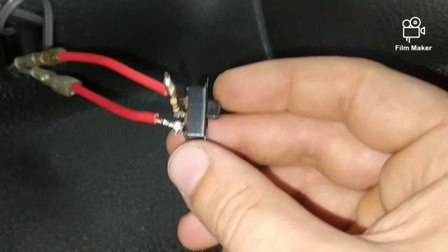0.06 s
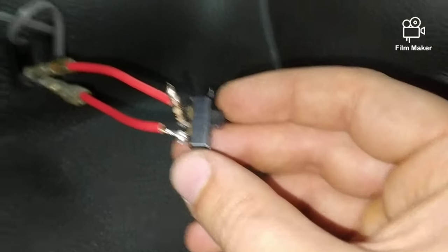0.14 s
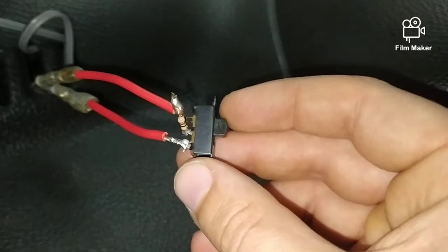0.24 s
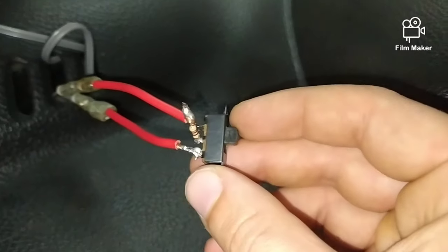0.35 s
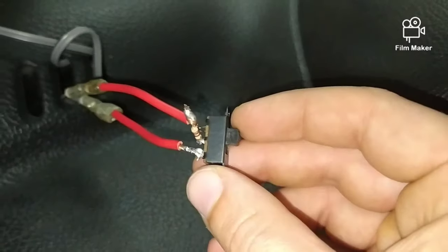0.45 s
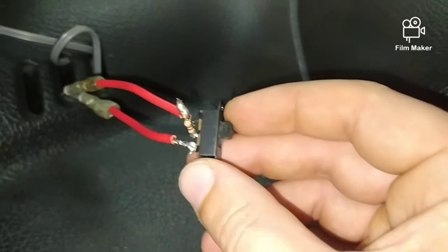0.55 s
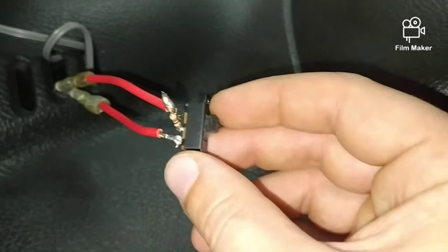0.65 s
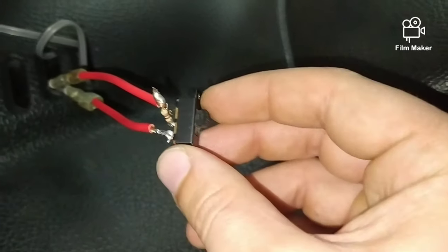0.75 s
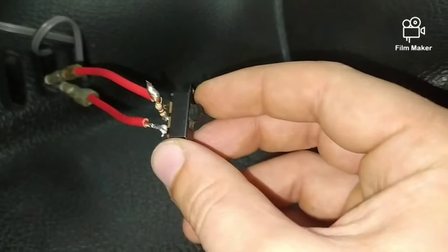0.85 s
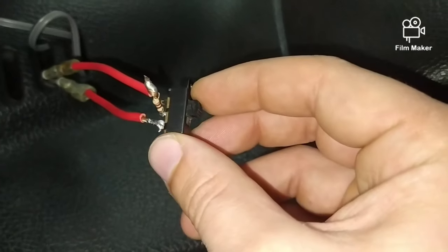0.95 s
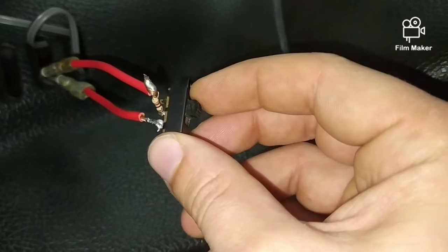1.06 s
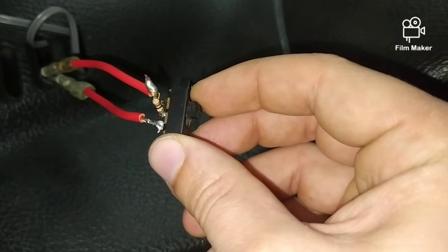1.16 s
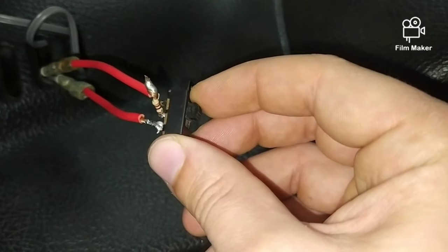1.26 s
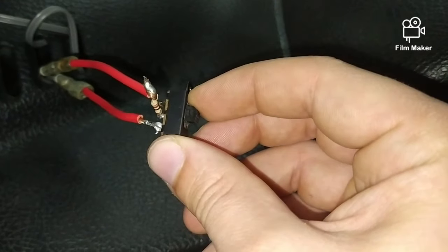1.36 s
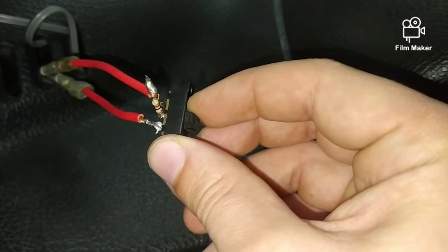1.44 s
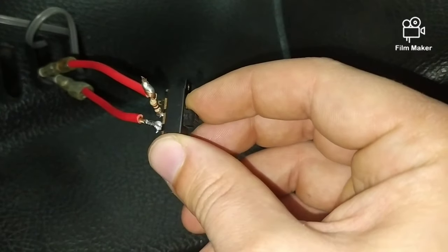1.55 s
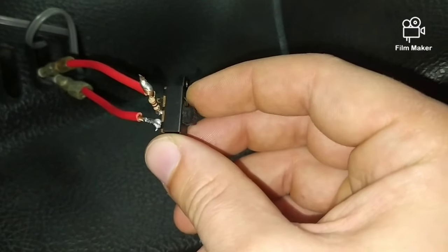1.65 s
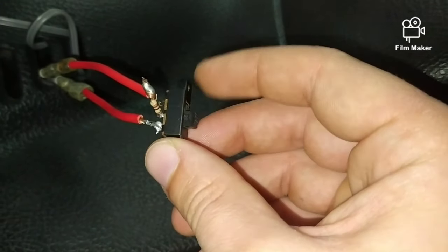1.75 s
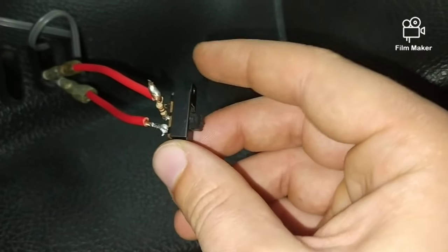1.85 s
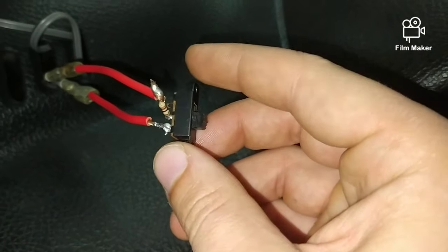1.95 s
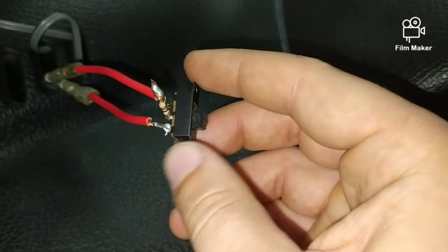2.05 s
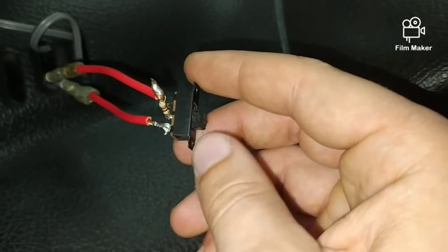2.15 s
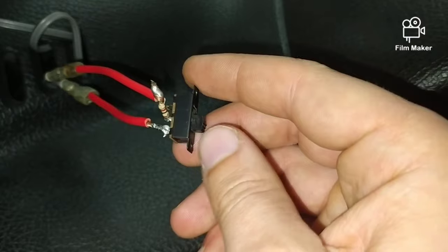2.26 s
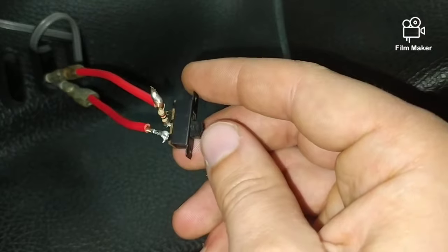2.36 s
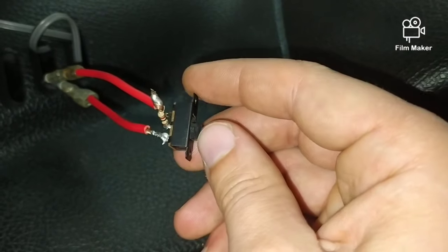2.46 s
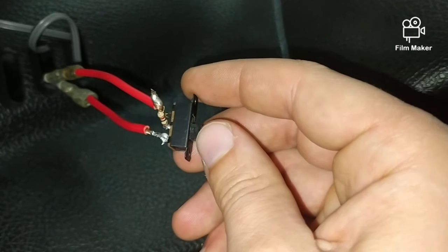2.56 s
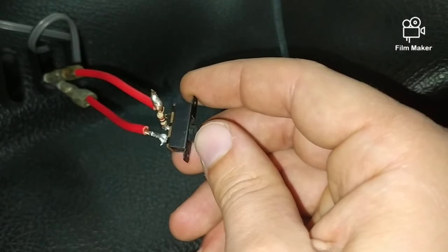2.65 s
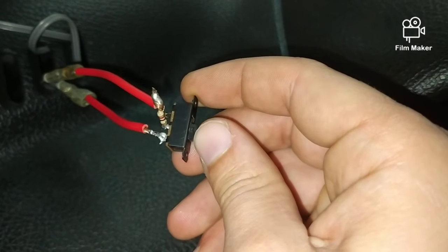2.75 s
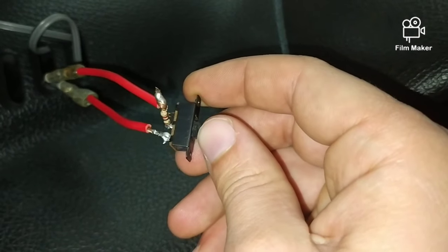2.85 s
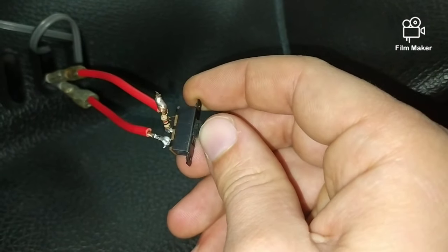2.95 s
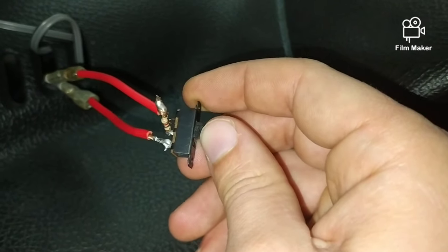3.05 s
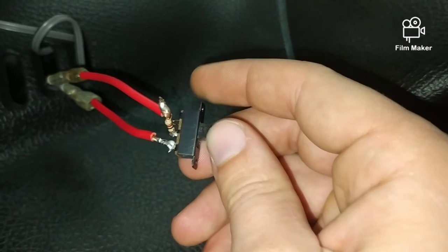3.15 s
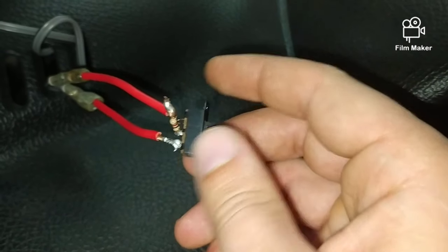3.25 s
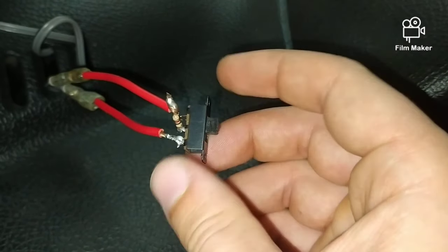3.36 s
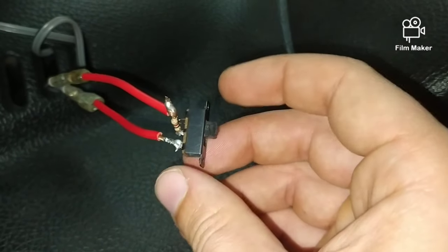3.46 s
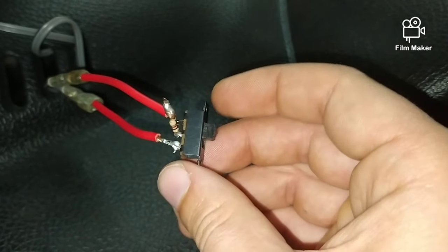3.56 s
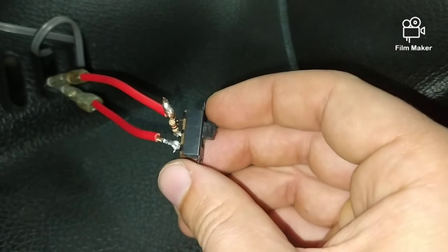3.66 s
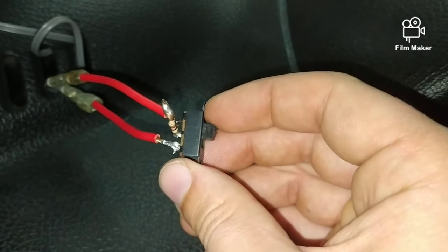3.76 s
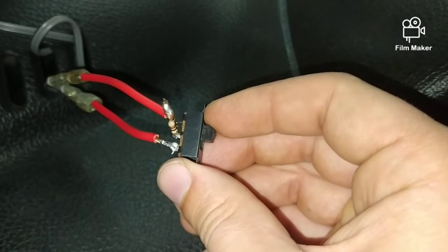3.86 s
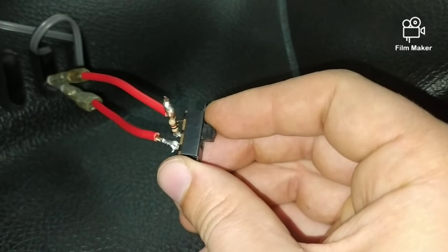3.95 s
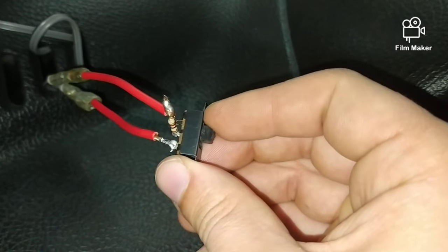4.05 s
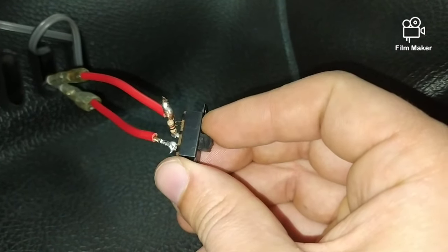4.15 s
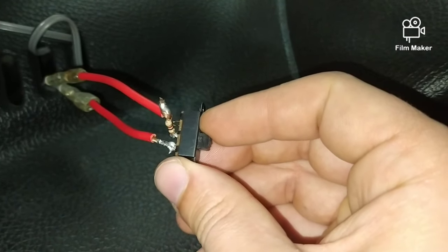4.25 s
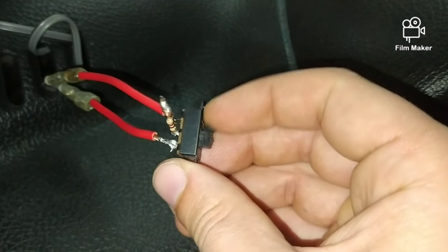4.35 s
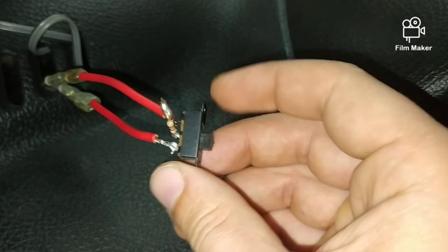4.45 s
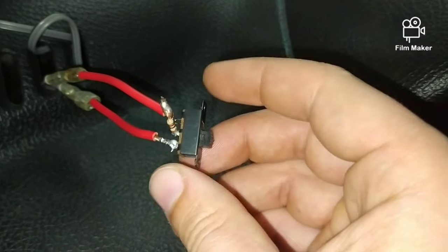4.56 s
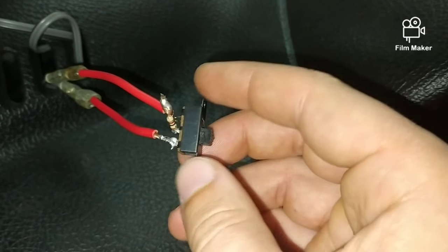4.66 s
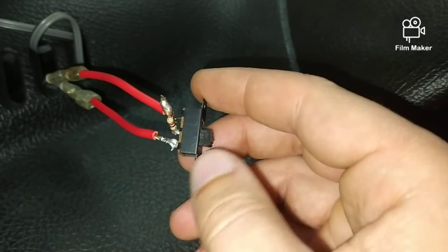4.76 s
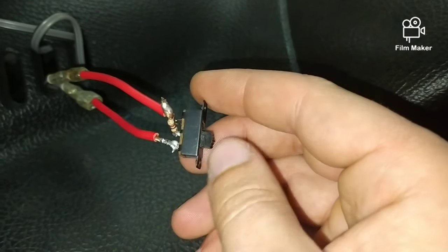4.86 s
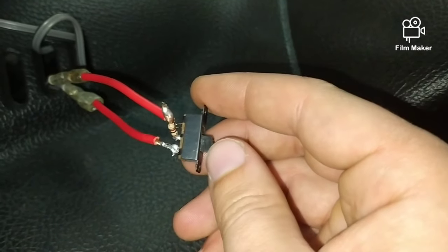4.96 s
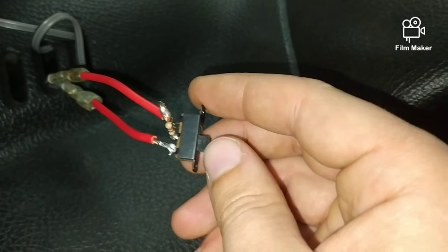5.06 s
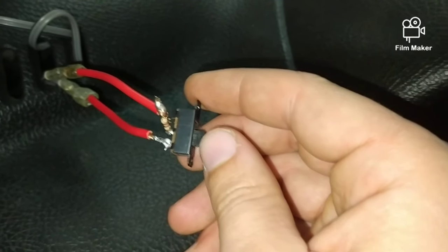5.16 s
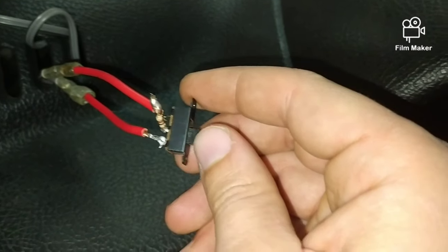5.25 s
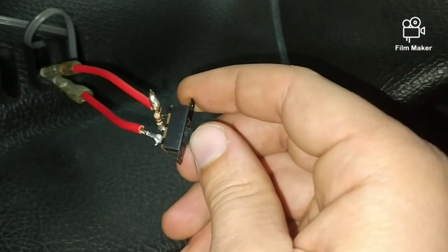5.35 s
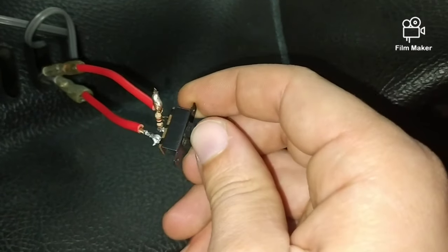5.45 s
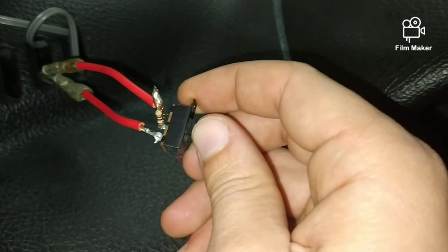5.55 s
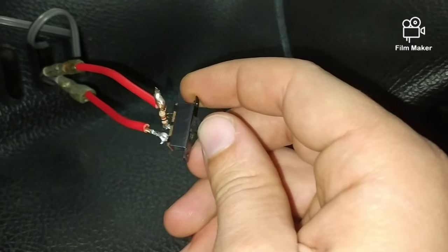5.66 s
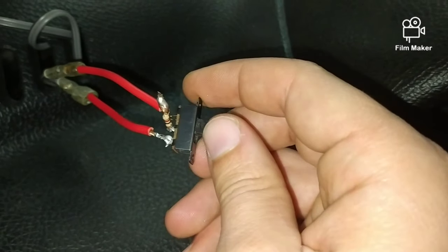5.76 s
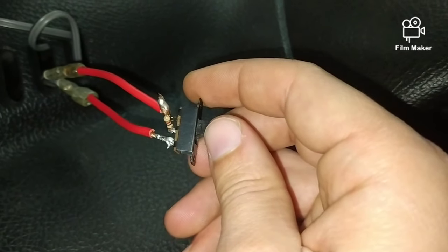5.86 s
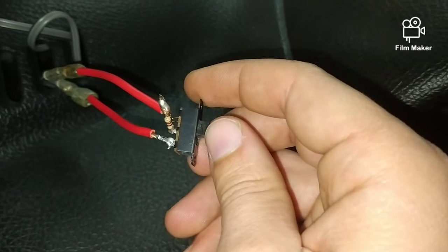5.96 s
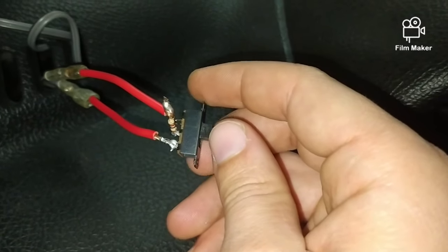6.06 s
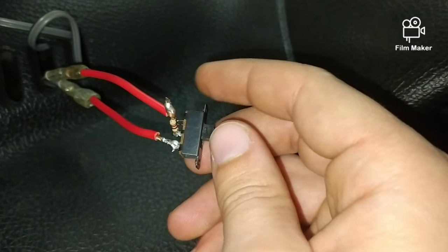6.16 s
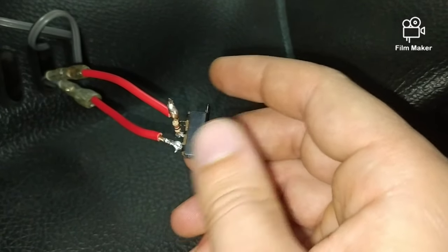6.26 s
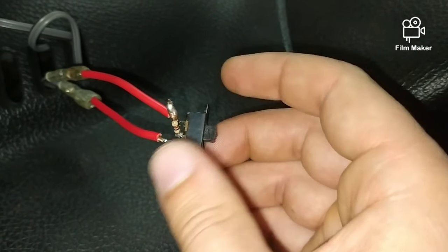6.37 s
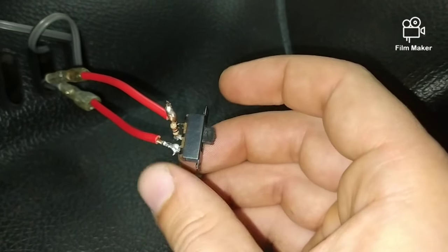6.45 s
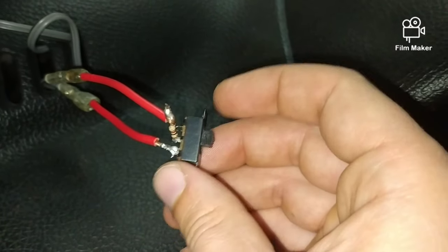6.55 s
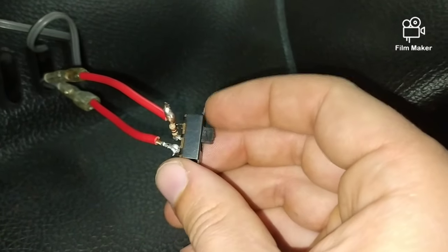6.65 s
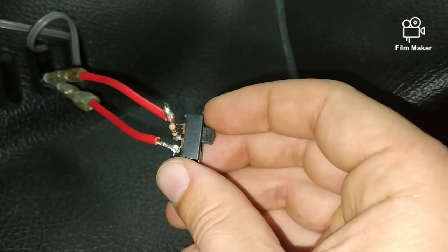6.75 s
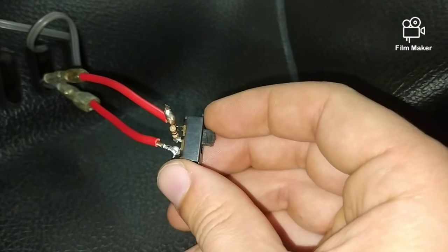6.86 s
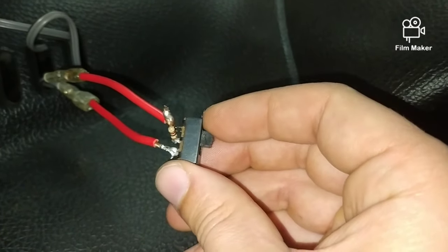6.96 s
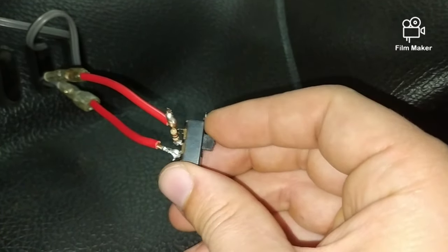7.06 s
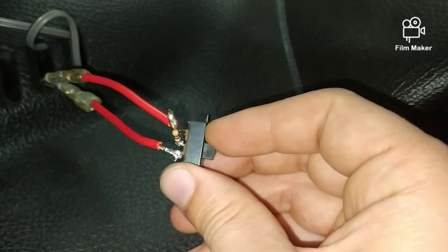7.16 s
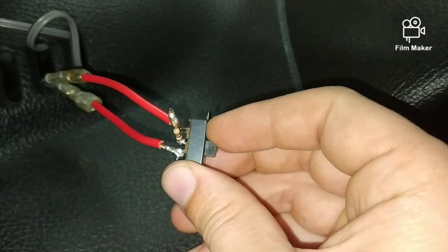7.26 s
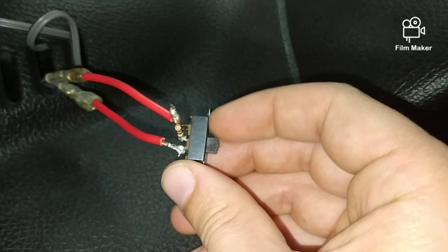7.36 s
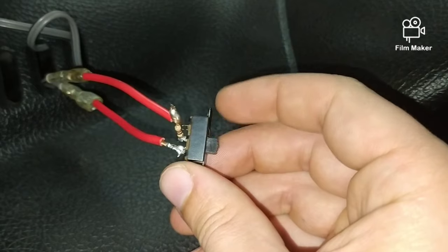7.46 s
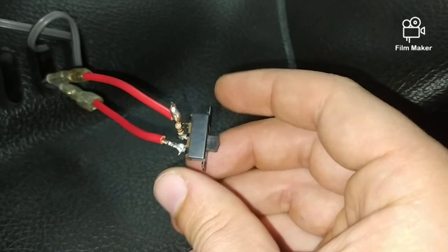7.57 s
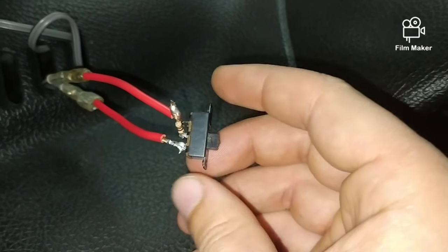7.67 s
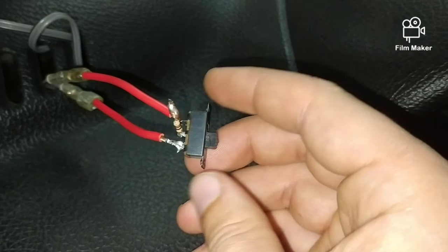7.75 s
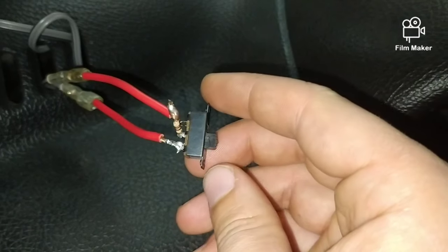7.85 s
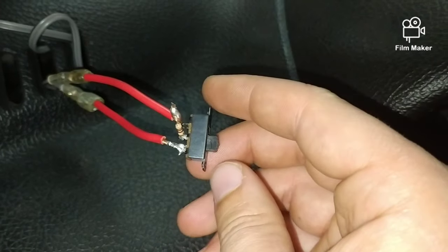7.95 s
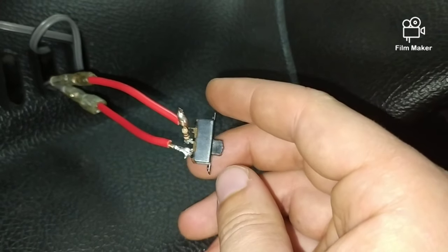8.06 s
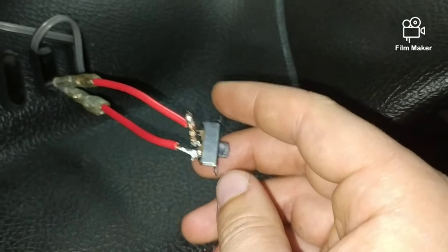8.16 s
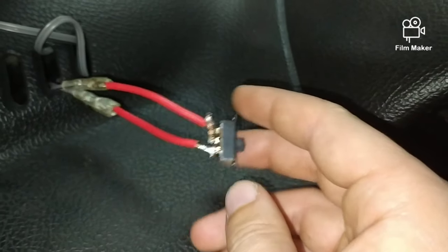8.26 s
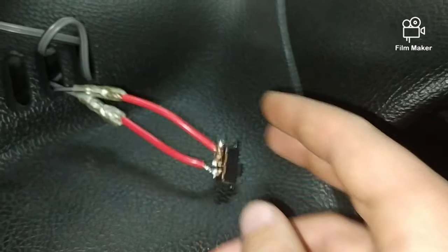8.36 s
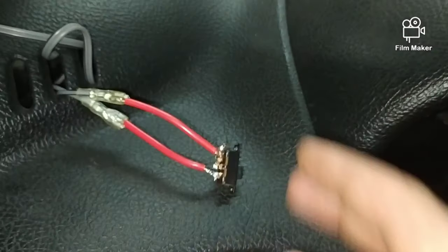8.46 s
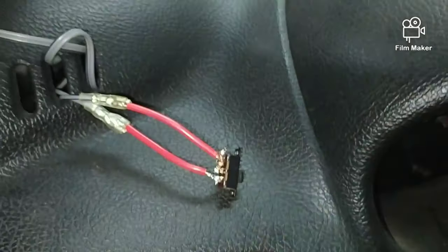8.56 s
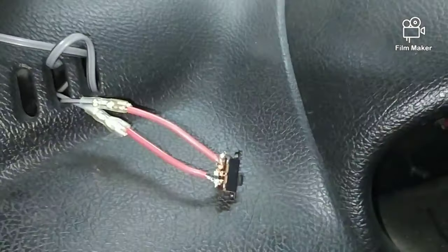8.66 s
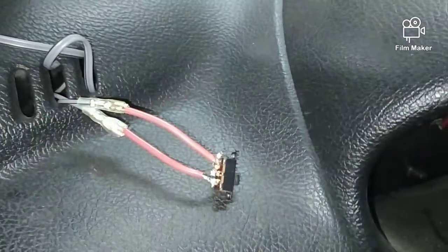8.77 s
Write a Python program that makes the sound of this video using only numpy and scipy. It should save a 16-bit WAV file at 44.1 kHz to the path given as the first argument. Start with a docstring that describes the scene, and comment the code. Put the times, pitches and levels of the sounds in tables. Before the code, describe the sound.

Close stereo phone pickup inside a parked car: near silence, light hiss and a very faint, steady cricket to the right. A little switch is pushed back and forth, giving five hard, sharp clicks, with small dull taps, skin rustle and grip creaks around them. After a pause, fingers slip away, the switch drops against a plastic panel with a bouncing clack, and a sleeve rustles softly.

```python
"""First heard is a quiet night, faint air and hiss, with a cricket outside on the right: narrow noise in chirps.
Inside a parked car, close to a phone with two microphone ports, a hand works a small slide switch on stiff
wires. Each snap is a burst of contacts ringing the metal shell and echoing in the cabin. Fingers and sleeve
rustle as grainy filtered noise; the switch taps a plastic panel and at last drops against it.
"""
import sys
import numpy as np
from scipy import signal
from scipy.fft import rfft, irfft, next_fast_len
from scipy.io import wavfile
from scipy.ndimage import uniform_filter1d

SR = 44100
rng = np.random.default_rng(int(sys.argv[2]) if len(sys.argv) > 2 else 0)


def field_ratio(decibels):
    """Amplitude ratio for a level in dB (20 dB per decade); scalars and array-likes work."""
    return 10 ** (np.asarray(decibels, dtype=float) / 20)


def digitize_waveform(pressure):
    """Quantize a signal to 16-bit integers and store it at the path in sys.argv[1].

    Rows of a 2-D input are taken as channels; values are limited to [-1, 1].
    """
    field = np.atleast_2d(pressure).T
    bounded = np.clip(field, -1, 1)
    quanta = np.round(bounded * 32767).astype(np.int16)
    wavfile.write(sys.argv[1], SR, quanta)


N = 388521
TIME = np.arange(N) / SR


def level(x, db):
    """Scale to an rms level."""
    return x * field_ratio(db) / np.sqrt(np.mean(x ** 2))


def resonate(x, peaks):
    """Sum of band-pass resonances (frequency [Hz], width [Hz], level [dB])."""
    return sum(field_ratio(db) * signal.lfilter(*signal.iirpeak(hz, hz / width, SR), x) for hz, width, db in peaks)


def walk(rate):
    """Random levels around zero, held 1 / rate s and slewed."""
    hold = int(SR / rate)
    steps = np.repeat(rng.standard_normal(N // hold + 1), hold)
    return uniform_filter1d(steps, hold)[:N]


def sides(pan_db):
    """Left and right gains for a left-minus-right difference."""
    return field_ratio(np.array([[pan_db], [-pan_db]]) / 2)


def swell(start, rise, hold, fall_db, db):
    """Gain that rises smoothly, holds and dies away at a steady rate in dB per s."""
    t = TIME - start
    after = np.maximum(t - rise - hold, 0)
    return np.sin(np.pi / 2 * np.clip(t / rise, 0, 1)) ** 3 * field_ratio(db - fall_db * after)


def friction(peaks, alike, grain_db):
    """Noise in uneven grains through the resonances of what is rubbed; alike is the share common to both ports."""
    shared, own = rng.standard_normal(N), rng.standard_normal((2, N))
    noise = np.sqrt(alike) * shared + np.sqrt(1 - alike) * own
    grains = field_ratio(grain_db * walk(60)) * noise
    return level(resonate(resonate(grains, peaks), peaks), 0)


NEAR_ECHO_DB, NEAR_LOSS_DB_PER_MS = -26.5, 1.4
FAR_ECHO_MS, FAR_ECHO_DB, FAR_LOSS_DB_PER_MS = 7.7, -32.5, 1.12
LATE_DB, LATE_LOSS_DB_PER_MS = -65, 0.37


def cabin(shared_hz=900):
    """Direct path, echoes of near panels and far windows, a faint long tail; the ports share the bass only."""
    ms = np.arange(int(.3 * SR)) / SR * 1000
    near = field_ratio(NEAR_ECHO_DB - NEAR_LOSS_DB_PER_MS * ms)
    far = np.clip(ms - FAR_ECHO_MS + 1, 0, 1) * field_ratio(FAR_ECHO_DB - FAR_LOSS_DB_PER_MS * (ms - FAR_ECHO_MS))
    late = field_ratio(LATE_DB - LATE_LOSS_DB_PER_MS * ms)
    echo = rng.standard_normal((3, len(ms))) * np.sqrt(near ** 2 + far ** 2 + late ** 2)
    low = signal.lfilter(*signal.butter(2, shared_hz, fs=SR), echo)
    echo = low[2] + echo[:2] - low[:2]
    echo[:, 0] = 1  # direct path
    return echo


PORT_HZ, PORT_WIDTH_HZ, OFF_PORT_DB_PER_S = 8920, 700, 420
LEFT_PORT_DB, LEFT_PORT_WIDTH_HZ = 3.5, 1100  # the left port resonates more strongly
BUILD_CYCLES = 3.1  # a resonance needs about this long to build up, so the lows come late


def strike(peaks, colour_db, contacts_ms, contacts_db, lag_ms, damp_db):
    """Quick contacts, echoed by the cabin, ring each resonance; the sound reaches the left port a little later."""
    force = np.zeros((2, SR // 100))
    size = field_ratio(contacts_db) * rng.choice([-1, 1], len(contacts_db))
    for port, lag in enumerate([lag_ms, 0]):
        force[port, ((np.asarray(contacts_ms) + lag) * SR / 1000).astype(int)] = size
    heard = signal.fftconvolve(force, cabin(), axes=1)
    hit = 0
    for (hz, width, db), change_db in zip(peaks, colour_db):
        ring = resonate(resonate(heard, [(hz, width, 0)]), [(hz, 2.9 * width, 0)])
        t = np.arange(ring.shape[1]) / SR
        # broad resonances lose their echoes sooner; the band where the ports resonate lasts longest
        fade_db = damp_db * np.sqrt(width) + OFF_PORT_DB_PER_S * min(abs(hz - PORT_HZ) / PORT_WIDTH_HZ, 1)
        build = 1 - np.exp(-(t * hz / BUILD_CYCLES) ** 2)
        ring = ring * field_ratio(-fade_db * np.minimum(t, .06)) * build
        ring = ring / np.sqrt(np.sum(ring ** 2, 1, keepdims=True))
        lean = sides(LEFT_PORT_DB * np.exp(-((hz - PORT_HZ) / LEFT_PORT_WIDTH_HZ) ** 2))
        # neighbouring resonances swing in opposite senses, so the valleys between them stay filled
        hit = -hit + field_ratio(db + change_db) * lean * ring
    return hit


def add(out, sound, s, db, pan_db):
    """Mix a two-port sound in at a time, level and side."""
    first = int(s * SR)
    sound = sound[:, :N - first]
    out[:, first:first + sound.shape[1]] += sound * field_ratio(db) * sides(pan_db)


# spectrum of the night air before its overall level: (frequency [Hz], relative density [dB per Hz])
NIGHT_SPECTRUM = [(3, -31), (6, 4.5), (40, -5), (100, -16), (320, -18), (950, -28.5), (2550, -30.5),
                  (3250, -35.5), (4400, -35), (5400, -37), (8900, -33.5), (9600, -32.5), (9900, -29.5),
                  (10250, -33), (10700, -30.5), (11000, -45), (12300, -42), (12750, -34.5), (13500, -48),
                  (15600, -48), (16000, -61.5), (16400, -86)]
# far hum: (frequency [Hz], width [Hz], level [dB])
FAR_HUM = (198, 18, -81.5)
NIGHT_DB = -66.5


def night():
    """Distant air and microphone hiss as shaped noise, partly shared in the bass; narrow noise is a wavering hum."""
    hz, db = np.transpose(NIGHT_SPECTRUM)
    size = next_fast_len(N)
    f = np.maximum(np.arange(size // 2 + 1) * SR / size, 1)
    alike = 0.079 * np.clip(np.log2(1400 / f) / 2.0, 0, 1)
    noise = rfft(rng.standard_normal((3, size)))
    mixed = np.sqrt(alike) * noise[2] + np.sqrt(1 - alike) * noise[:2]
    air = irfft(mixed * field_ratio(np.interp(np.log(f), np.log(hz), db)), size)[:, :N]
    hum_hz, hum_width, hum_db = FAR_HUM
    hum = resonate(rng.standard_normal(N), [(hum_hz, hum_width, 0)])
    return level(air, NIGHT_DB) * field_ratio(0.15 * walk(4.3)) + level(hum, hum_db)


CRICKET_HZ, CRICKET_DB, CRICKET_LEFT_DB = 4504, -79.5, -19  # left gain relative to the right
CHIRP_START_S, CHIRP_PERIOD_S, CHIRP_LENGTH_S, SYLLABLES_HZ = .095, .4588, .35, 43


def cricket():
    """Even chirps of short wing strokes on one pitch over a weaker steady tone, made grainy by echoes on the way."""
    place = (TIME - CHIRP_START_S) % CHIRP_PERIOD_S / CHIRP_LENGTH_S
    chirp = 0.29 + np.sin(np.pi * np.clip(place, 0, 1)) ** 0.34
    strokes = 1 + .3 * np.sin(2 * np.pi * SYLLABLES_HZ * TIME + 1.5 * walk(8))
    # narrow noise gives the grain
    wing = resonate(rng.standard_normal((2, N)), [(CRICKET_HZ, 120, 0)])
    wing = resonate(wing, [(CRICKET_HZ, 200, 0)])
    return level(wing * chirp * strokes, CRICKET_DB) * field_ratio(np.array([[CRICKET_LEFT_DB], [0]]))


# faint narrow squeaks on the right: (start [s], hold [s], pitch [Hz], width [Hz], level [dB])
SQUEAK_EVENTS = [(0.636, 0.074, 1860, 200, -77.5), (3.211, 0.036, 2230, 348, -73.5)]
SQUEAK_RISE_S, SQUEAK_FALL_DB_PER_S, SQUEAK_PAN_DB = .012, 130, -10


def squeaks():
    """Short bands of narrow noise, perhaps skin or leather slipping."""
    out = 0
    for s, hold, hz, width, db in SQUEAK_EVENTS:
        gain = swell(s, SQUEAK_RISE_S, hold, SQUEAK_FALL_DB_PER_S, db)
        out = out + friction([(hz, width, 0)], 0.38, 1.7) * gain
    return out * sides(SQUEAK_PAN_DB)


# fingers sliding, and last the swinging wires rubbing the panel after the drop; the hiss does not hold: (start
# [s], rub hold [s], rub level [dB], skin hiss level [dB])
SLIDES = [(0.64, 0.071, -80.5, -78), (1.579, 0.086, -67, -69.5), (2.555, .07, -75, -76),
          (2.985, 0.058, -67, -72), (3.195, 0.036, -86, -78), (4.23, 0.079, -65.5, -69.5),
          (5.569, 0.076, -70, -73), (6.693, .01, -76.5, -83.5), (7.206, 0.064, -66, -81.5),
          (8.44, .01, -64.5, -88)]
# the sleeve rustles as the hand draws away: (start [s], hold [s], level [dB])
SLEEVE_RUSTLE = (8.45, .34, -77)
# resonances of the dull rub, then of the skin hiss: (frequency [Hz], width [Hz], level [dB])
RUB_PEAKS = [(890, 270, 0.5), (1430, 800, 1), (2000, 860, -0.05)]
SKIN_PEAKS = [(2610, 900, -9.5), (4670, 2600, 0), (6620, 4200, -3), (8700, 1300, 1.5), (13000, 4000, -11.5)]
SLIDE_RISE_S, RUB_FALL_DB_PER_S, HISS_FALL_DB_PER_S, RUB_TOP_HZ = 0.032, 77.5, 71, 2620


def slides():
    """Fingers rub dully and skin hisses at each slide, and once the switch has dropped its swinging wires rub
    the panel; the sleeve's rustle has the same hiss."""
    rub, hiss = 0, swell(SLEEVE_RUSTLE[0], 0.056, SLEEVE_RUSTLE[1], HISS_FALL_DB_PER_S, SLEEVE_RUSTLE[2])
    for s, hold, rub_db, hiss_db in SLIDES:
        rub = rub + swell(s, SLIDE_RISE_S, hold, RUB_FALL_DB_PER_S, rub_db)
        hiss = hiss + swell(s, SLIDE_RISE_S, 0, HISS_FALL_DB_PER_S, hiss_db)
    low_pass = signal.butter(8, RUB_TOP_HZ, fs=SR, output="sos")
    dull = signal.sosfilt(low_pass, friction(RUB_PEAKS, 0.086, grain_db=1.5))
    skin = friction(SKIN_PEAKS, 0.063, grain_db=2.0)
    return dull * rub * sides(pan_db=-9.0) + skin * hiss * sides(pan_db=-8.5)


# taps on the panel: (time [s], level [dB], depth [dB], brightness [dB], left minus right [dB])
PANEL_TAPS = [(0.995, -43.5, -14, -9, -2), (1.33, -49.5, -2, -8, -6), (2.226, -45.5, -12, -13, -3),
              (2.651, -46, -12, -6.5, 0), (3.195, -42.5, -7, -18, 3), (3.932, -40, -11.5, -13.5, -1),
              (4.027, -46, 1.5, -17, -7), (5.19, -58.5, -5, 0, -4), (5.417, -43.5, -8, -9, -1),
              (6.58, -49.5, 5, -10, -2), (7.028, -48.5, -2, -10.5, 7), (8.254, -43, 2, -11, -1.5),
              (8.298, -50, 18, -5, 0), (8.441, -13, -4.5, 4.5, -1.5)]
# where depth, no change and brightness apply: (frequency [Hz])
TAP_COLOUR_HZ = [360, 560, 2000]
# resonances of the free panel, then of taps damped by the hand: (frequency [Hz], width [Hz], level [dB])
PANEL_PEAKS = [(201, 77, -23), (352, 190, 3), (482, 74, 2), (635, 88, -1.5), (799, 300, -9),
               (1098, 390, -8), (1556, 220, -4), (1864, 230, -5.5), (2290, 170, -7), (2630, 210, -2),
               (3250, 390, -12.5), (3900, 390, -12.5), (4600, 1060, -11), (6700, 1100, -18.5),
               (8700, 960, -11.5), (11900, 2300, -33.5)]
HELD_PEAKS = [(340, 81, -0.5), (626, 400, 1), (960, 390, 4), (1500, 850, 0.5), (2170, 870, 6),
              (3600, 2000, -2.5), (8600, 4000, -8)]
LET_GO_S = 8.4  # until then the hand holds the switch and damps the taps
BOUNCE_GAP_MS, BOUNCE_LOSS_DB_PER_MS, BOUNCE_SCATTER_DB = 1.2, 3.5, 0.5


def panel(lead_ms=0.6, bounces=6):
    """Switch and wires knock the plastic panel in a few uneven bounces; each knock has its own depth and brightness."""
    out = np.zeros((2, N))
    for s, db, deep_db, bright_db, pan_db in PANEL_TAPS:
        bounce_ms = BOUNCE_GAP_MS * (np.arange(bounces) + rng.uniform(0, .5, bounces))
        bounce_db = -BOUNCE_LOSS_DB_PER_MS * bounce_ms + BOUNCE_SCATTER_DB * rng.standard_normal(bounces)
        body = HELD_PEAKS if s < LET_GO_S else PANEL_PEAKS
        log_hz = np.log(np.array(body)[:, 0])
        colour_db = np.interp(log_hz, np.log(TAP_COLOUR_HZ), [deep_db, 0, bright_db])
        knock = strike(body, colour_db, bounce_ms, bounce_db, lag_ms=0.04, damp_db=4.0)
        add(out, knock, s - lead_ms / 1000, db, pan_db)
    return out


# snaps, low to top relative to the usual colour: (time [s], level [dB], low [dB], thud [dB], shell [dB],
# top [dB], chatter [dB], left minus right [dB])
SWITCH_SNAPS = [(1.458, 3, -6, 5, -2.5, 1.5, -1.5, -4), (2.9454, -4, -1, -1, -4.5, 1, -4, -8.5),
                (4.169, 1.5, 2.5, -1, 2.5, 2.5, -1.5, -6.5), (5.5051, -2.5, 2, 0, -2, 0.5, -3, -7),
                (7.1617, 4, 2.5, -4, 2.5, -1.5, -4.5, -6)]
# where low, thud, shell, shell, no change and top apply: (frequency [Hz])
SNAP_COLOUR_HZ = [200, 400, 1200, 6200, 8800, 12000]
# resonances of the switch, then the dry crack of the slam: (frequency [Hz], width [Hz], level [dB])
SWITCH_PEAKS = [(200, 95, -37), (383.8, 120, -31), (700, 950, -39.5), (1140.7, 360, -28), (1560, 830, -32),
                (2200, 900, -21.5), (3190, 750, -32.5), (4054, 640, -29.5), (4830, 780, -21.5),
                (5760, 450, -13.5), (6295, 600, -10), (6972, 980, -8.5), (8656, 490, -6), (8820, 160, -8),
                (8880, 400, -4), (9117, 160, -7), (9960, 660, -2), (10710, 2400, -9), (12400, 3000, -14),
                (14000, 700, -18), (14900, 830, -18.5)]
CRACK_PEAKS = [(7800, 3900, 0)]
SLIP_MS, SLIP_DB, SLIP_RISE_DB_PER_MS = 1.5, -25.5, 10
CHATTER_GAP_MS, CHATTER_GROWTH, CHATTER_LOSS_DB_PER_MS, CHATTER_SCATTER_DB = .35, 1.3, 4.5, 3
CRACK_LATE_MS, CRACK_DB = 0.32, -1.5  # after the slam; level relative to the snap
PORT_LAG_MS = .25  # a snap reaches the left port later


def switch(slips=4, bounces=6):
    """The slider slips over the detent ever harder, then slams on its stop and chatters with widening gaps."""
    out, log_hz = np.zeros((2, N)), np.log(np.array(SWITCH_PEAKS)[:, 0])
    blow = np.zeros((2, SR // 100))
    blow[0, int(PORT_LAG_MS * SR / 1000)] = blow[1, 0] = 1
    crack = resonate(resonate(blow, CRACK_PEAKS), CRACK_PEAKS)
    for s, db, low_db, thud_db, shell_db, top_db, chatter_db, pan_db in SWITCH_SNAPS:
        before_ms = SLIP_MS * rng.uniform(0, 1, slips)
        gaps_ms = CHATTER_GAP_MS * CHATTER_GROWTH ** np.arange(bounces) * rng.uniform(.7, 1.3, bounces)
        after_ms = np.cumsum(gaps_ms)
        after_db = chatter_db - CHATTER_LOSS_DB_PER_MS * after_ms
        after_db = after_db + CHATTER_SCATTER_DB * rng.standard_normal(bounces)
        # slips, slam, chatter
        contacts_ms = np.r_[SLIP_MS - before_ms, SLIP_MS, SLIP_MS + after_ms]
        contacts_db = np.r_[SLIP_DB - SLIP_RISE_DB_PER_MS * before_ms, 0, after_db]
        bands_db = [low_db, thud_db, shell_db, shell_db, 0, top_db]
        colour_db = np.interp(log_hz, np.log(SNAP_COLOUR_HZ), bands_db)
        snap = strike(SWITCH_PEAKS, colour_db, contacts_ms, contacts_db, lag_ms=PORT_LAG_MS, damp_db=1.0)
        add(out, snap, s - SLIP_MS / 1000, db, pan_db)
        add(out, crack, s + CRACK_LATE_MS / 1000, db + CRACK_DB, pan_db)
    return out


# treble that lingers after a snap: (frequency [Hz], width [Hz], level [dB])
LINGER_PEAKS = [(6500, 2000, -6.5), (8675, 1400, 1)]
LINGER_DB, LINGER_RISE_S, LINGER_FALL_DB_PER_S = -64.5, 0.045, 76.5  # level relative to the snap


def linger():
    """The treble of each snap hangs in the cabin as a smooth fading hiss, leaning half as far to the side."""
    fade = 0
    for s, db, *_, pan_db in SWITCH_SNAPS:
        fade = fade + swell(s, LINGER_RISE_S, 0, LINGER_FALL_DB_PER_S, db + LINGER_DB) * sides(pan_db / 2)
    hiss = resonate(resonate(rng.standard_normal((2, N)), LINGER_PEAKS), LINGER_PEAKS)
    return level(hiss, 0) * fade


# creaks of the grip, and one of the swinging wires just after the drop: (start [s], hold [s], level [dB], left
# minus right [dB])
CREAKS = [(1.576, 0.16, -72.5, -1.5), (2.782, 0.15, -62, -2.5), (3.004, 0.091, -74, -1),
          (4.222, 0.078, -72, -3), (6.7, 0.16, -75.5, -6.5), (7.169, 0.25, -65.5, -3.5),
          (8.432, 0.0086, -53.5, -1.5), (8.698, 0.048, -67.5, -1)]
# resonances of the creak: (frequency [Hz], width [Hz], level [dB])
CREAK_PEAKS = [(198, 89, 4.5), (315, 110, 6.5), (480, 200, -3)]
CREAK_RISE_S, CREAK_FALL_DB_PER_S = 0.02, 140.5


def creaks():
    """The low creak of the grip, and of the swinging wires after the drop, is grainy noise that reaches both
    ports mostly alike."""
    creak = 0
    for s, hold, db, pan_db in CREAKS:
        creak = creak + swell(s, CREAK_RISE_S, hold, CREAK_FALL_DB_PER_S, db) * sides(pan_db)
    return friction(CREAK_PEAKS, 0.77, grain_db=1.6) * creak


# the sleeve brushes softly while the hand shifts: (start [s], hold [s], level [dB])
SLEEVE_BRUSHES = [(4.559, .55, -84.5), (7.875, 0.075, -77), (8.052, 0.12, -84), (8.2, .08, -82),
                  (8.522, .25, -79)]
# resonance of the cloth: (frequency [Hz], width [Hz], level [dB])
BRUSH_PEAKS = [(2055, 400, 0)]
BRUSH_RISE_S, BRUSH_FALL_DB_PER_S = 0.054, 60


def brushes():
    """The sleeve's soft brushing is one band of grainy noise, stronger on the right."""
    gain = sum(swell(s, BRUSH_RISE_S, hold, BRUSH_FALL_DB_PER_S, db) for s, hold, db in SLEEVE_BRUSHES)
    return friction(BRUSH_PEAKS, 0.092, grain_db=1.5) * gain * sides(pan_db=-12.0)


# the deep bass swells briefly: (start [s], hold [s], level [dB])
BASS_SWELLS = [(6.697, .08, -71), (7.879, .08, -65)]
# its band: (frequency [Hz], width [Hz], level [dB])
RUMBLE_PEAKS = [(58.1, 53, 0)]


def rumble():
    """Soft swells of deep bass, a band of noise partly shared by the ports."""
    return friction(RUMBLE_PEAKS, 0.38, 0) * sum(swell(s, .05, hold, 120, db) for s, hold, db in BASS_SWELLS)


# the fingers slip off the switch, as start, loudest moment, end: (time [s])
SLIP_OFF_TIMES = [8.305, 8.38, 8.425]
# resonances of the scrape: (frequency [Hz], width [Hz], level [dB])
SCRAPE_PEAKS = [(890, 1100, 0), (2440, 640, 0.5), (4220, 1500, -4.5), (6450, 2600, -1), (8400, 1100, 0.2),
                (9900, 870, -21), (13800, 4000, -14)]
SLIP_OFF_DB = -59


def slip_off():
    """The fingers scrape off the switch: grainy noise that swells and fades once."""
    shape = np.sin(np.interp(TIME, SLIP_OFF_TIMES, [0, np.pi / 2, np.pi])) ** 1.1
    return friction(SCRAPE_PEAKS, 0.097, grain_db=3.0) * shape * field_ratio(SLIP_OFF_DB) * sides(pan_db=-4.5)


def scene():
    """Hits over the soft sounds of hand and night."""
    outside = night() + cricket()
    hand = squeaks() + slides() + creaks() + brushes() + slip_off()
    hits = panel() + switch() + linger()
    return outside + hand + hits + rumble()


def top_cut(x):
    """Nothing passes above the cut-off."""
    return signal.sosfilt(signal.butter(12, 16840, fs=SR, output="sos"), x)


TOP_HZ = 15500


def record(dry):
    """The phone cuts the top with a steep low-pass."""
    cut = signal.sosfilt(signal.butter(10, TOP_HZ, fs=SR, output="sos"), dry)
    return top_cut(cut)


dry = scene()
out = record(dry)
digitize_waveform(out)
```